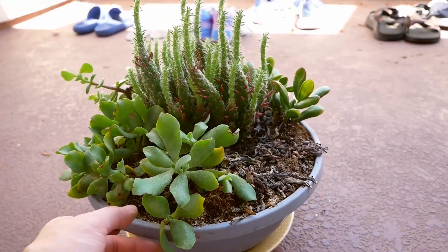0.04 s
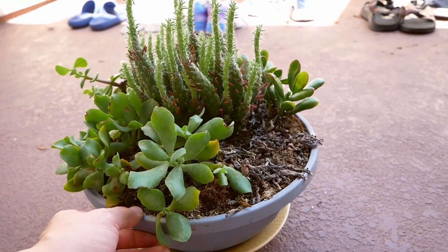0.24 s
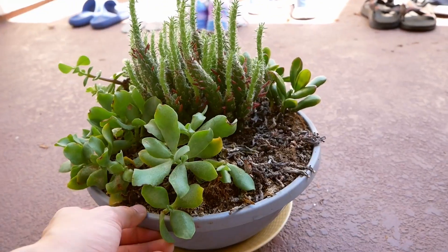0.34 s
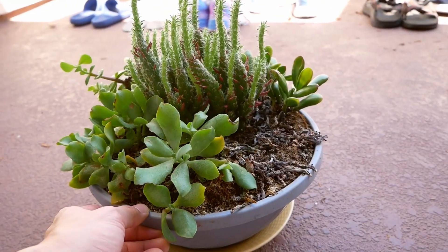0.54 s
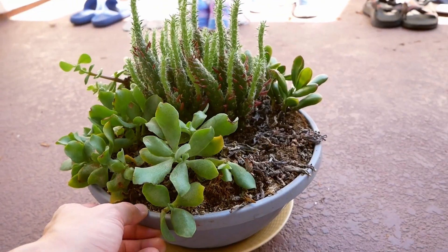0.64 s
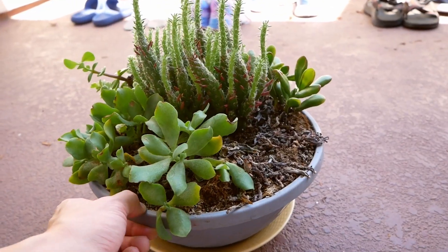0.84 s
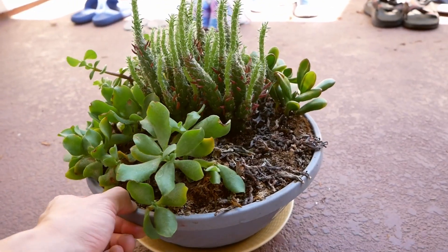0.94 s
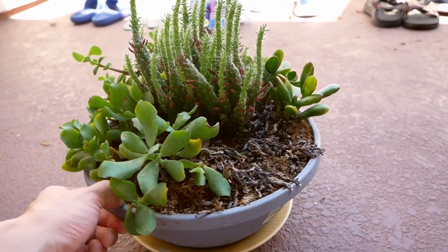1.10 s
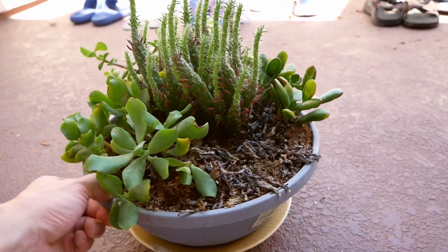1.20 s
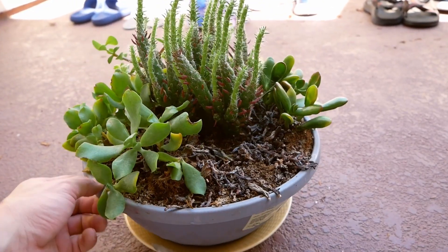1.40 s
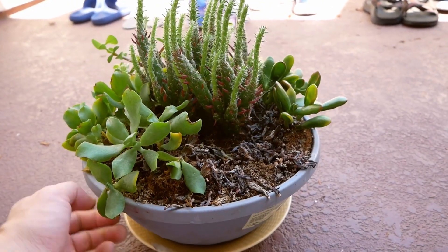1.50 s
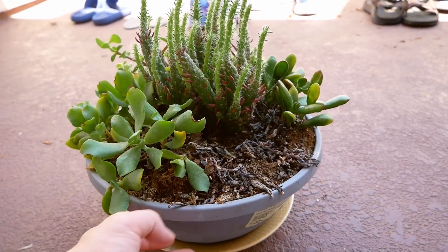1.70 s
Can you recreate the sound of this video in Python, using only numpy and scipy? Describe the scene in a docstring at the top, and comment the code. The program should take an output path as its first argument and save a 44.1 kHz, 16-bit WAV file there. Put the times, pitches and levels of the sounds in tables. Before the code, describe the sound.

A heavy plastic plant pot scrapes on concrete, close by and slightly left. A faint rustle and a tiny dry squeak at 0.2 seconds come first. From about 0.8 to 1.4 seconds the pot and saucer grind over grit, hollow and rasping with small knocks, easing near 1.1 seconds before a weaker shove. Leaves brush faintly around 1.5 seconds. A low outdoor rumble and faint distant motor hum lie underneath.

```python
"""A heavy plastic plant pot is turned by hand in its saucer on a concrete patio. Stick-slip friction gives
a short dry squeak; then the pot breaks loose, grinds over the grit, catches and shoves on once more,
each slip exciting the modes of pot, saucer and rim. Leaves and fingers brush the pot faintly.
Behind it are a low outdoor rumble and the hum of a distant motor; nearby walls reflect the close sounds."""
import sys
import numpy as np
from scipy import signal
from scipy.fft import rfft, irfft, next_fast_len
from scipy.io import wavfile
from scipy.ndimage import map_coordinates

SR = 44100
rng = np.random.default_rng(int(sys.argv[2]) if len(sys.argv) > 2 else 0)


def inscribe(sig):
    """Save sig as 16-bit PCM at rate SR to the path in sys.argv[1].

    A 1-D sig is mono; a 2-D sig holds one channel per row.
    Samples are clipped to [-1, 1] before scaling.
    """
    pcm = np.round(np.clip(np.atleast_2d(sig).T, -1, 1) * 32767)
    wavfile.write(sys.argv[1], SR, pcm.astype(np.int16))


N = 77175

# Resonances of the filled pot, the saucer and the rim. Each row: frequency in Hz, bandwidth in Hz,
# relative level in dB, change in dB once the pot has shifted.
POT_MODES = [(187, 14, 5, -10), (203, 16, 0, 1), (240, 26, -1, -5), (293, 24, 2, 0), (335, 24, -3, 0),
             (360, 20, 2, 0), (395, 26, -4, 3), (439, 26, 0, 2), (503, 18, 0, 1), (544, 18, -1, 0),
             (585, 24, -4, 0), (625, 16, 1, -6), (785, 15, 6, -18), (850, 70, -6, -5)]
SAUCER_MODES = [(1168, 18, 3, -2), (1222, 44, -4, 0), (1276, 22, 0, 0), (1324, 22, 1, -2),
                (1397, 14, 5, -3), (1500, 80, -9, 3), (1761, 20, -12, 4), (1850, 140, -25, 14)]
RIM_MODES = [(1980, 90, -2, 3), (2300, 160, -2, 2), (2440, 100, 0, 0), (2850, 180, -2, -1),
             (3280, 200, -8, 1), (3720, 180, -5, 0), (3860, 100, 3, -5), (4400, 160, -7, 0),
             (5150, 80, -10, 0)]
# Broadband responses of pot, saucer and grit. Each row: frequency in Hz, relative level in dB.
THUD_SPECTRUM = [(45, -44), (110, 5.5), (160, -17), (280, 7.5), (560, 7.5), (720, 3.5), (1000, -8.5),
                 (2000, -48), (8000, -100)]
RASP_SPECTRUM = [(350, -23), (650, 9), (820, 12.5), (1000, 8), (1250, 17.5), (1450, 6.5), (1700, 3),
                 (3000, -9.5), (9000, -110)]
GRIT_SPECTRUM = [(900, -11.5), (1800, 3.5), (2700, 8.5), (4300, 2.5), (5500, -4), (7000, -7.5), (8000, -20),
                 (9200, -9), (10500, -11.5), (13000, -41)]
def pot():
    """Forced vibration: friction and knocks drive the modes and broadband responses of the parts."""
    bass, *rub = sliding_friction()
    knock = catches()
    pot_force, saucer_force, grit_force = rub + knock
    pot_drive, saucer_drive, rim_drive = rub + amp(-18.5) * knock  # pressed down, a caught base rings less
    split_hz = 320
    deep = shifting_modes(bass, [mode for mode in POT_MODES if mode[0] < split_hz])
    hollow = shifting_modes(pot_drive, [mode for mode in POT_MODES if mode[0] >= split_hz])
    thud = amp(-12.5) * through(pot_force, colour(THUD_SPECTRUM))
    saucer = amp(-1) * shifting_modes(saucer_drive, SAUCER_MODES)
    rasp = amp(-6) * through(saucer_force, colour(RASP_SPECTRUM))
    rim = amp(1.5) * shifting_modes(rim_drive, RIM_MODES)
    grit = amp(-4.5) * through(grit_force, colour(GRIT_SPECTRUM))
    return (place(deep + hollow + thud, left_db=1.5, wall_db=-12)
            + place(saucer + rasp, left_db=3.2, wall_db=-6)
            + place(rim + grit, left_db=0.4, wall_db=-4))


# Friction during the slide. Each row: time in seconds, then force level in dB on the pot's bass modes,
# on the rest of the pot, on the saucer, and on rim and grit.
SLIDE_FORCES = [(0.792, -60, -55, -50, -61), (0.815, -55, -45.5, -58, -53.5),
                (0.823, -50, -38.5, -36.5, -52), (0.85, -49, -41, -38, -46),
                (0.868, -43.5, -39.5, -44, -51), (0.89, -37, -41, -40.5, -52.5),
                (0.933, -41.5, -40.5, -37.5, -55.5), (0.957, -31, -37, -41, -56.5),
                (0.99, -38.5, -36.5, -39, -54.5), (1.035, -42.5, -33.5, -42.5, -54),
                (1.062, -52, -42.5, -45.5, -58.5), (1.09, -37, -47.5, -43, -57.5),
                (1.112, -50, -50, -53, -60.5), (1.158, -51, -50, -58, -67), (1.175, -44.5, -46, -46, -48.5),
                (1.2, -50, -45.5, -52.5, -60), (1.255, -48, -42.5, -44.5, -54),
                (1.285, -39, -36.5, -48.5, -50.5), (1.305, -46, -49.5, -56.5, -56),
                (1.34, -55.5, -53, -56.5, -61.5), (1.385, -74, -77, -65, -68)]
def sliding_friction():
    """Friction on grit is a dense train of tiny slips. Returns four forces, from bass to treble."""
    t = np.arange(N) / SR
    sliding = (t > SLIDE_FORCES[0][0]) & (t < SLIDE_FORCES[-1][0])
    coarse = slips(per_s=2200, spread_db=4) * sliding
    fine = slips(per_s=7000, spread_db=3) * sliding
    mixed = (coarse + fine) / np.sqrt(2)
    return np.array([coarse, coarse, coarse, mixed]) * amp(curves(SLIDE_FORCES))


# The base catches and lets go. Each row: start in seconds, force level on the saucer in dB,
# then the levels on the pot and on rim and grit, in dB relative to it.
CATCHES = [(0.7937, -35.5, -4, -7.5), (0.8215, -36, -21, -3), (0.8254, -32.5, 0, -5.5), (0.8405, -44, 3, 5),
           (0.8454, -39.5, 11.5, 3.5), (0.8539, -36, -4, 0), (0.8958, -42, 15.5, -5),
           (1.0009, -36.5, 12.5, -31), (1.021, -43, 25, -12), (1.035, -44.5, 24, -24),
           (1.1008, -33.5, 4, -26), (1.1647, -37, 14, -3.5), (1.2733, -42.5, 16, -8),
           (1.2873, -45.5, 15.5, -2)]
def catches():
    """Impulsive excitation: each catch knocks pot and saucer and sends a noise burst to rim and grit."""
    rattle_s, averaging_s = 0.003, 0.0055  # a level is the knock's energy spread over averaging_s
    t = np.arange(N) / SR
    knock = np.zeros((3, N))
    for start_s, db, pot_db, rim_db in CATCHES:
        i = round(start_s * SR)
        push = amp(db) * np.sqrt(averaging_s * SR)
        crush = rng.standard_normal(N)[:N - i] * np.exp(-t[:N - i] / rattle_s)
        knock[0, i] += push * amp(pot_db)
        knock[1, i] += push
        knock[2, i:] += push * amp(rim_db) * crush / np.linalg.norm(crush)
    return knock


def shifting_modes(force, modes):
    """The contact point sets the balance of modes; it changes as the pot settles elsewhere on its base."""
    shift_s = (1.1, 1.16)
    shifted = np.interp(np.arange(N) / SR, shift_s, [0, 1])
    before = ring([(hz, width, db) for hz, width, db, change in modes])
    after = ring([(hz, width, db + change) for hz, width, db, change in modes])
    return through(force * (1 - shifted), before) + through(force * shifted, after)


# The dry squeak. Each row: time of the peak in seconds, half-width in seconds, force level in dB.
SQUEAKS = [(0.219, 0.0065, -43)]
# Resonances of the squeaking spot. Each row: frequency in Hz, bandwidth in Hz, relative level in dB.
SQUEAK_MODES = [(2368, 110, -1), (2810, 120, -2), (2955, 120, -1), (3490, 150, -4), (3778, 160, 2),
                (4343, 150, -5), (4633, 120, -3), (5147, 130, -4)]
# The squeak's bright, sandy edge. Each row: frequency in Hz, relative level in dB.
SAND_SPECTRUM = [(2000, -12), (4500, 0), (6200, 3), (7200, -1), (8000, -15), (8900, -2), (10200, -2),
                 (11900, -9), (13200, -38)]
def squeak():
    """Stick-slip oscillation: the plastic grips and lets go almost periodically, over a fine rasp."""
    slip_hz = 783 * np.exp(0.26 * wobble(400))
    cycles = np.cumsum(slip_hz) / SR
    releases = np.diff(np.floor(cycles), prepend=0)
    pulses = unit(releases * amp(1.5 * rng.standard_normal(N)))
    rasp = amp(-2) * rng.standard_normal(N)
    force = unit(pulses + rasp) * swells(SQUEAKS)
    response = ring(SQUEAK_MODES) + amp(-12) * colour(SAND_SPECTRUM)
    return place(through(force, response), left_db=2.0, wall_db=-13)


# Touches on the pot. Each row: time of the peak in seconds, half-width in seconds, force level in dB.
BRUSHES = [(0.088, 0.065, -62.5), (1.435, 0.00061, -54.5), (1.449, 0.023, -58), (1.503, 0.017, -58),
           (1.514, 0.0055, -56)]
# Response of the leaves. Each row: frequency in Hz, relative level in dB.
LEAF_SPECTRUM = [(1500, 6), (2500, 5), (3400, 5), (4300, 13), (4800, -1), (5300, 2.5), (7500, -13.5),
                 (10000, -17), (15000, -51)]
def brushes():
    """Shot noise: many tiny contacts of leaves and fingers merge into a soft crackle."""
    force = slips(per_s=2500, spread_db=4.2) * swells(BRUSHES)
    return place(through(force, colour(LEAF_SPECTRUM)), left_db=2.5, wall_db=-10.5)


# Outdoor rumble and thin hiss. Each row: frequency in Hz, relative level in dB.
AIR_SPECTRUM = [(45, -20), (68, -12.5), (85, -9), (120, 0), (200, -3), (290, -6.5), (400, -12.5),
                (600, -12.5), (900, -17), (1500, -25.5), (2500, -28.5), (4400, -32.5), (7500, -46),
                (10000, -48), (15000, -66.5)]
# Its stereo width. Each row: frequency in Hz, level of the side signal over the mid signal in dB.
AIR_WIDTH = [(100, -9.5), (300, 0), (1000, 0.5), (8000, -18.5)]
# Its slow course. Each row: time in seconds, level of the mid signal in dB.
AIR_LEVEL = [(0, -50), (0.4, -49.5), (0.8, -49.5), (1.4, -49), (1.75, -50)]
def outdoors():
    """Partly coherent noise: the channels are much alike in bass and treble, unrelated in the midrange."""
    response = colour(AIR_SPECTRUM)
    noises = rng.standard_normal((2, N + len(response)))
    mid, side = (unit(signal.fftconvolve(noise, response, "valid")[:N]) for noise in noises)
    width_db = np.interp(np.fft.rfftfreq(N, 1 / SR), *np.transpose(AIR_WIDTH))
    side = irfft(rfft(side) * amp(width_db), N)
    level_db, = curves(AIR_LEVEL)
    return np.array([mid + side, mid - side]) * amp(level_db + 1.28 * wobble(7.93))


# Swell of the motor's overtones. Each row: time in seconds, common level in dB.
OVERTONE_LEVEL = [(0, -87), (0.15, -51.5), (0.48, -49), (0.75, -50.5), (0.95, -49), (1.3, -69), (1.75, -87)]
# The overtones. Each row: multiple of the fundamental, level in dB relative to the common level.
OVERTONES = [(2, -2.5), (3, -4.5)]
def motor():
    """Harmonic series: a distant motor hums on a wavering fundamental while its overtones swell and fade."""
    hum_hz, drift, waver_db = 85, 0.005, 1.3
    phase = 2 * np.pi * np.cumsum(hum_hz * (1 + drift * wobble(13.7))) / SR
    level_db, = curves(OVERTONE_LEVEL)
    overtones = sum(amp(level_db + db + waver_db * wobble(17.0)) * np.sin(k * phase)
                    for k, db in OVERTONES)
    fundamental = amp(-60.5 + waver_db * wobble(7.9)) * np.sin(phase)
    return np.sqrt(2) * (overtones + fundamental) * amp([[.4], [-.4]])


# Reverberation of the nearby walls. Each row: frequency in Hz, time to decay by 60 dB in seconds.
WALL_DECAY = [(150, 0.5), (1000, 0.16), (4000, 0.11), (12000, 0.47)]
def place(x, left_db, wall_db):
    """Diffuse reflection adds a separate tail to each channel; a level difference sets the direction."""
    hz, t, noise = signal.stft(rng.standard_normal((2, SR // 3)), SR, nperseg=256)
    t60 = np.interp(hz, *np.transpose(WALL_DECAY))
    tails = signal.istft(noise * amp(-60 * t / t60[:, None]), SR, nperseg=256)[1]
    delay_samples = 130
    wet = np.array([through(x, np.pad(h / np.linalg.norm(h), (delay_samples, 0))) for h in tails])
    pan = amp([[left_db / 2], [-left_db / 2]])
    return (x + amp(wall_db) * wet) * pan / np.sqrt(1 + amp(2 * wall_db))


def slips(per_s, spread_db):
    """A Poisson process of tiny impacts of uneven size, at rms 1."""
    chance, size, sign = rng.random(N), rng.standard_normal(N), rng.choice([-1, 1], N)
    return unit((chance < per_s / SR) * sign * amp(spread_db * np.clip(size, -2, 2)))


def ring(modes, size=8192):
    """Modal superposition: damped sines with softened onsets sum to an impulse response of energy 1."""
    t = np.arange(size) / SR
    h = sum((-1) ** k * amp(db) * width * np.exp(-np.pi * width * t)
            * np.sin(2 * np.pi * hz * t) * (1 - np.exp(-2 * np.pi * hz * t))
            for k, (hz, width, db) in enumerate(modes))
    return h / np.linalg.norm(h)


def colour(spectrum, size=8192):
    """Minimum-phase impulse response of energy 1 with the given spectrum."""
    hz, db = np.transpose(spectrum)
    log_hz = np.log(np.fft.rfftfreq(size, 1 / SR) + 1)
    cepstrum = irfft(np.log(amp(np.interp(log_hz, np.log(hz), db))))
    cepstrum[1:size // 2] *= 2  # folding onto positive time makes the response causal
    cepstrum[size // 2 + 1:] = 0
    h = irfft(np.exp(rfft(cepstrum)))
    return h / np.linalg.norm(h)


def through(force, response):
    """A linear system convolves its input with its impulse response."""
    return signal.fftconvolve(force, response)[:N]


def swells(rows):
    """An envelope of brief rises and falls, one hyperbolic secant a row."""
    t = np.arange(N) / SR
    return sum(amp(db) / np.cosh(np.clip((t - peak_s) / half_s, -20, 20)) for peak_s, half_s, db in rows)


def curves(rows):
    """Linear interpolation: one value per sample for each column after the time."""
    times, *columns = np.transpose(rows)
    return [np.interp(np.arange(N) / SR, times, column) for column in columns]


def wobble(knots_per_s):
    """A smooth spline through random knots."""
    return map_coordinates(rng.standard_normal(200), [np.arange(N) * knots_per_s / SR], mode="mirror")


def amp(db):
    """Decibels to gain."""
    return 10 ** (np.asarray(db) / 20)


def unit(x):
    """Scale to rms 1."""
    return x / np.sqrt(np.mean(x ** 2) + 1e-20)


def scene():
    """Superposition: the pressures of all sources on the patio add."""
    return pot() + squeak() + brushes() + outdoors() + motor()


def record(dry):
    """Band limiting: a shelf lowers the deep bass and a sharp cutoff removes the highest treble."""
    top_hz = 15350
    size = next_fast_len(N + SR // 2)
    hz = np.fft.rfftfreq(size, 1 / SR)
    low_shelf = amp(np.interp(hz, [55, 70, 80], [-9, -9, 0]))
    return irfft(rfft(dry, size) * low_shelf * (hz < top_hz), size)[:, :N]


dry = scene()
out = record(dry)
inscribe(out)
```